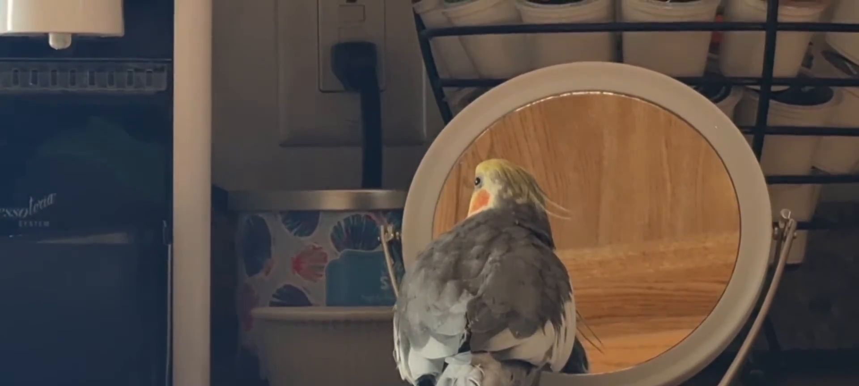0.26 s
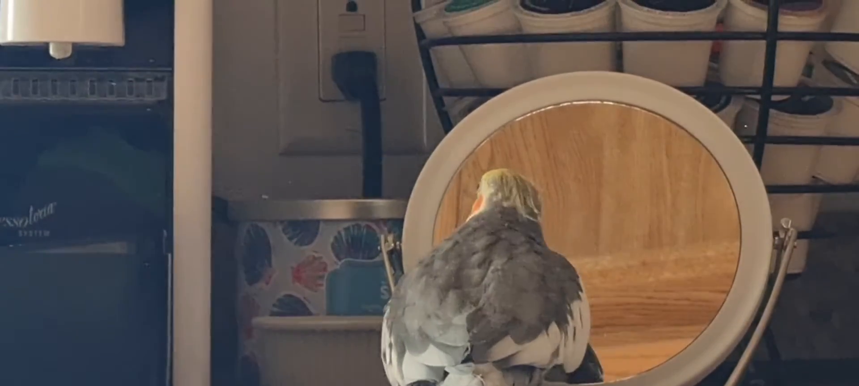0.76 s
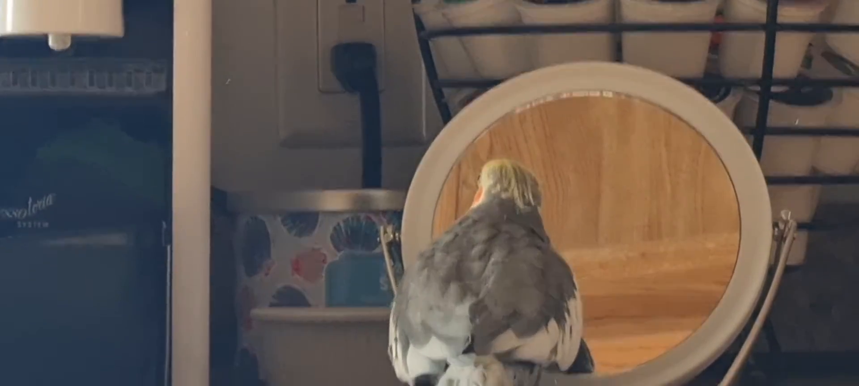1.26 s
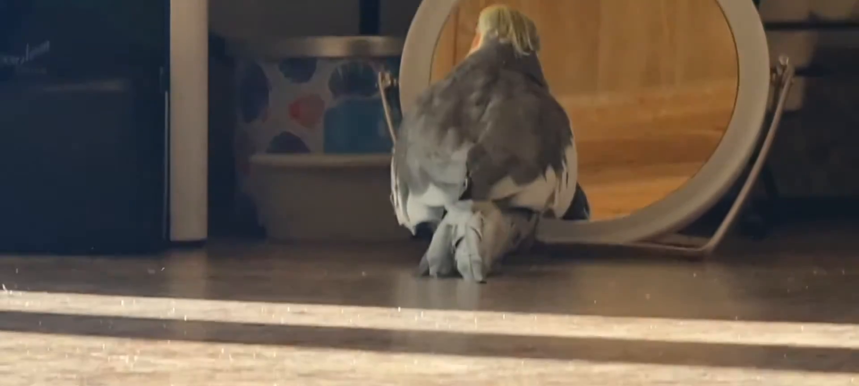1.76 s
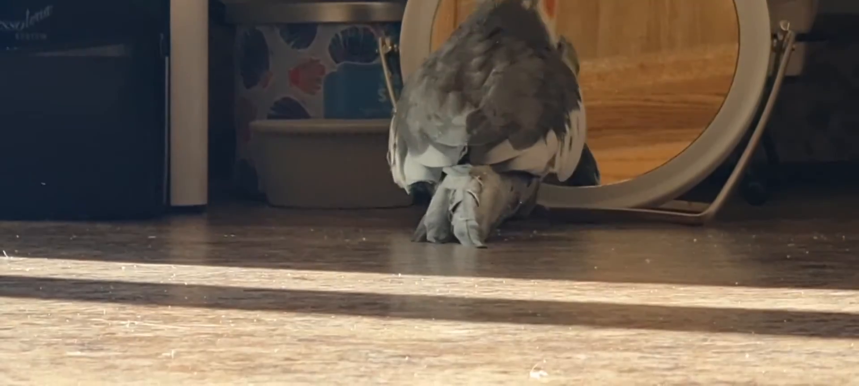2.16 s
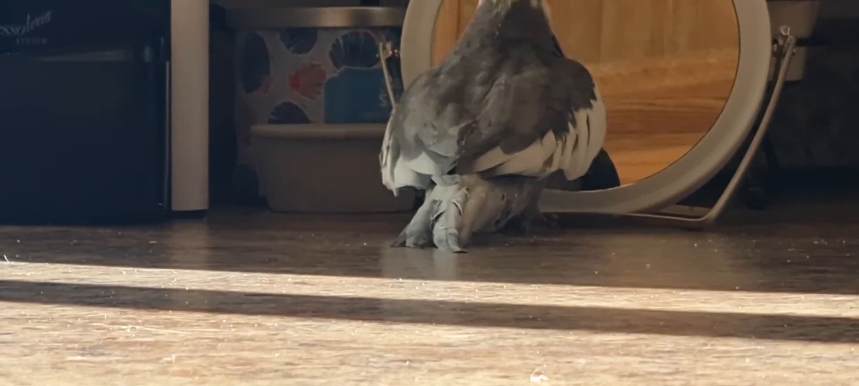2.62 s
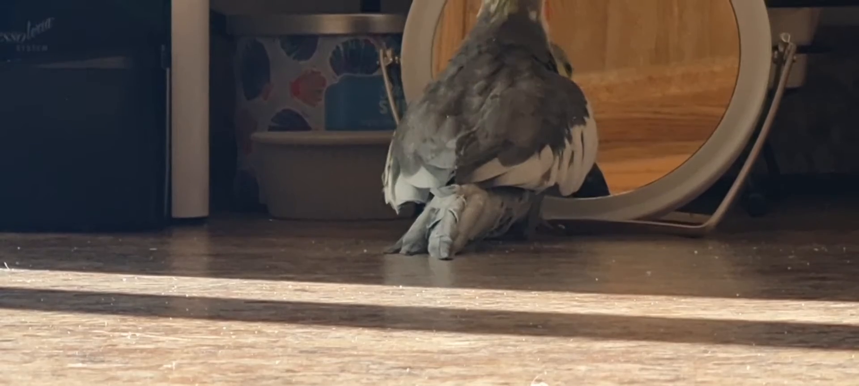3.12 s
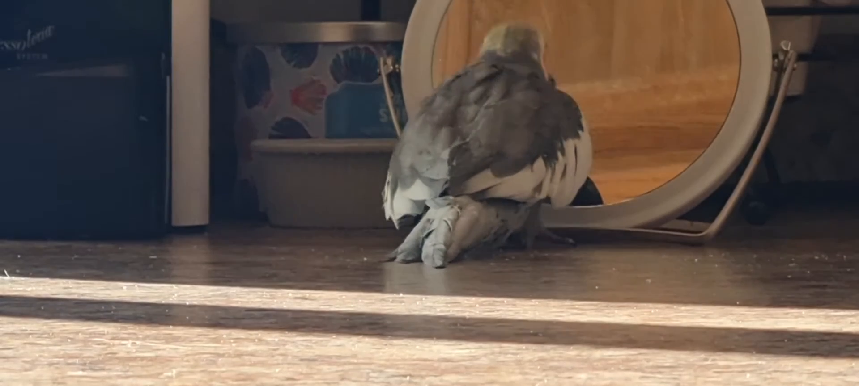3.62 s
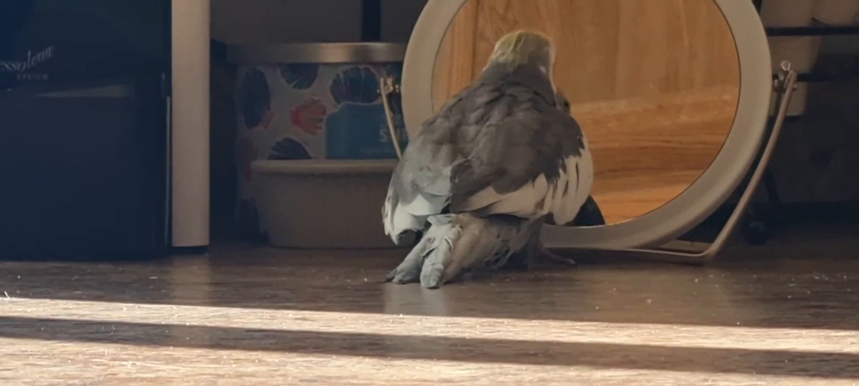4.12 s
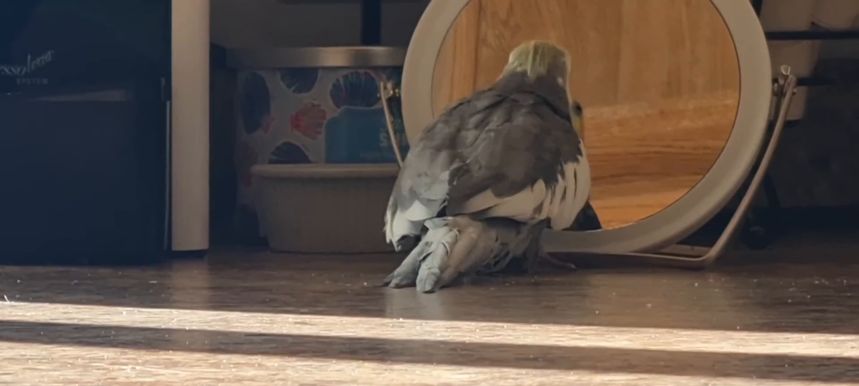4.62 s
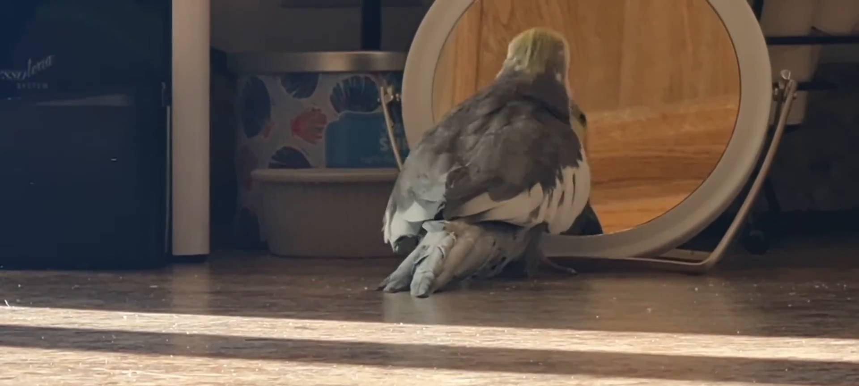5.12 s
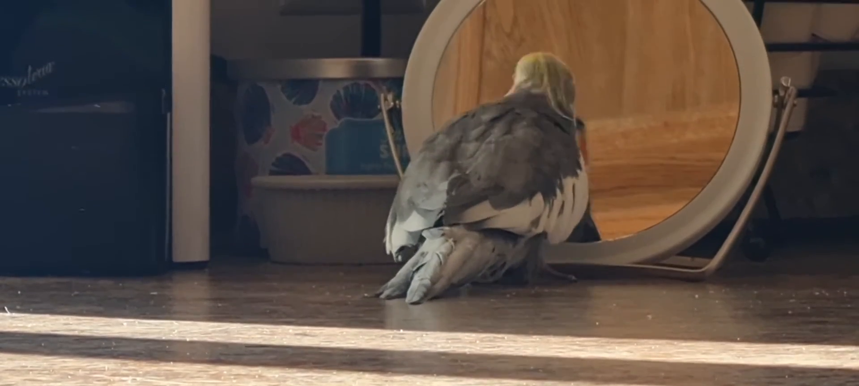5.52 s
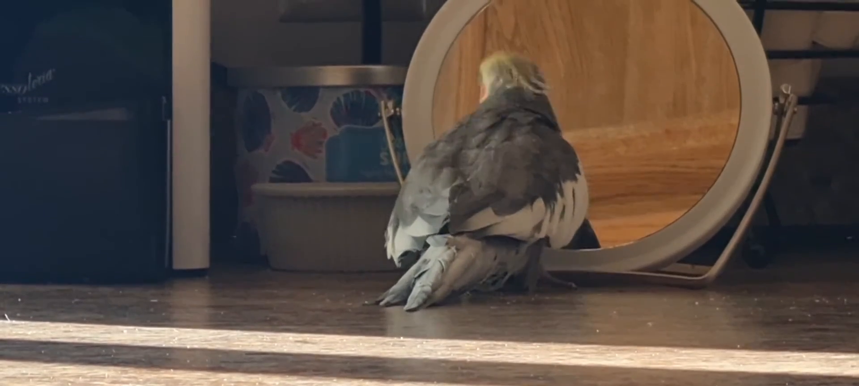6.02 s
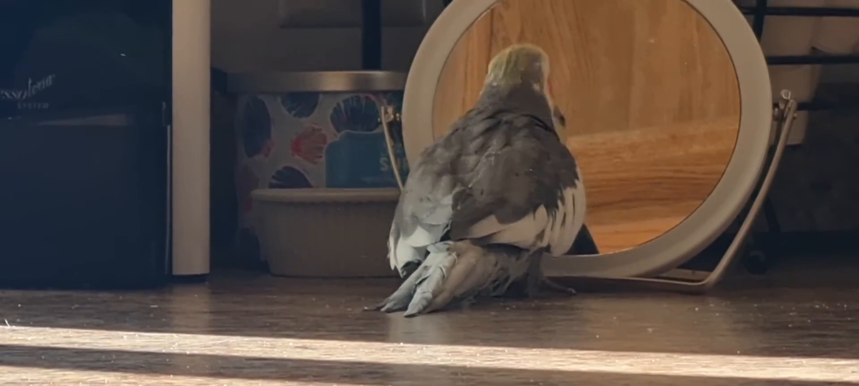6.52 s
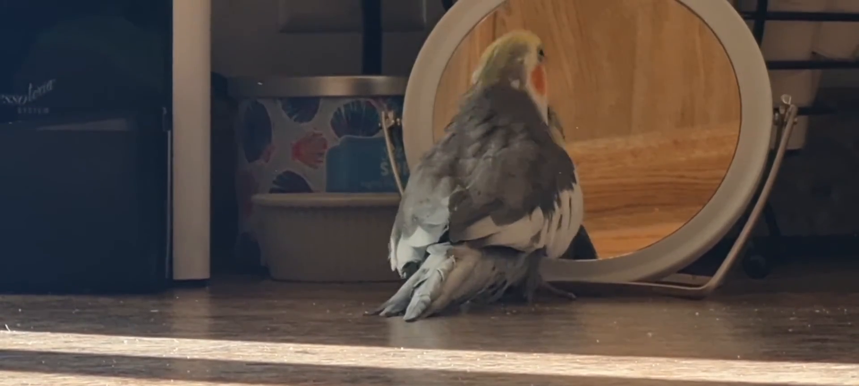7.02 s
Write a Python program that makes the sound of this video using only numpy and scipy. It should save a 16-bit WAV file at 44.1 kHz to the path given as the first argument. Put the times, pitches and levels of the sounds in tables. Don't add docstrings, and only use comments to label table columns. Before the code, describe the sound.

A cockatiel ticks its claws, chirps twice, then knocks its beak on wood and whistles short arched notes over a low household hum.

```python
import sys
import numpy as np
from scipy import signal
from scipy.fft import rfft, irfft
from scipy.io import wavfile
from scipy.ndimage import uniform_filter1d

SR = 44100
rng = np.random.default_rng(int(sys.argv[2]) if len(sys.argv) > 2 else 0)


def rack_gain(trim_db):
    fader = np.asarray(trim_db, float)
    return 10 ** (fader / 20)


def waveform_to_disk(signal):
    frames = np.transpose(np.atleast_2d(signal))
    scaled = np.clip(frames, -1, 1) * 32767
    samples = np.round(scaled).astype(np.int16)
    wavfile.write(sys.argv[1], SR, samples)


N = 320607

# time in seconds, pitch in Hz, level in dB.
HELD_NOTES = [
    [(2.915, 1718, -25.5), (2.973, 1930, -9.5), (3.009, 1942, -13), (3.061, 2089, -13.5),
     (3.159, 2013, -13.5), (3.203, 2060, -19.5), (3.225, 1933, -13), (3.245, 1702, -23),
     (3.26, 1834, -45.5)],
    [(3.51, 1531, -33.5), (3.532, 1522, -27), (3.558, 1740, -16.5), (3.606, 2071, -15.5),
     (3.658, 2117, -11), (3.684, 1921, -14.5), (3.716, 1457, -23), (3.734, 1306, -16.5),
     (3.775, 1200, -38.5)],
    [(4.85, 2059, -35.5), (4.86, 2168, -22), (4.876, 2216, -18.5), (4.906, 2080, -14), (4.93, 2187, -16.5),
     (4.96, 2141, -21), (4.99, 2224, -17), (5.014, 2009, -14), (5.03, 1954, -45)],
    [(5.55, 1664, -27), (5.592, 1891, -13.5), (5.648, 1873, -15), (5.73, 1788, -16.5), (5.738, 1696, -23),
     (5.786, 1745, -19.5), (5.808, 1676, -26.5), (5.912, 1647, -21), (5.945, 1576, -27.5)],
    [(6.515, 1830, -33.5), (6.559, 1956, -12), (6.569, 2055, -11), (6.655, 2186, -20), (6.687, 2063, -17.5),
     (6.729, 2092, -21), (6.821, 2135, -10.5), (6.891, 1952, -15), (6.9, 1956, -23.5)],]
# time in seconds, pitch in Hz, level in dB.
SLIDES = [
    [(5.305, 1670, -50), (5.317, 1708, -28), (5.397, 1422, -20.5), (5.405, 1286, -29.5),
     (5.41, 1414, -42.5)],
    [(7.165, 1615, -32), (7.189, 1599, -27), (7.207, 1794, -14.5), (7.243, 2041, -13), (7.27, 2075, -17.5)],
]
# multiple of the pitch, level in dB over the third overtone's setting.
LOW_OVERTONES = [(2, 9), (3, 5.5), (4, -11)]
# multiple of the pitch, level in dB over the sixth overtone's setting.
HIGH_OVERTONES = [(5, 4.5), (6, 5), (7, 3.5), (8, -13.5)]
EFFORT_DB, EFFORT_HZ = -15, 2050
OVERTONE_FOLLOWS, SIXTH_DB_PER_KHZ = 0.86, 61.5
SPLIT_DIMS_DB = 94.5
FALL_DB, FALL_FOLLOWS = -1, 0.35
FLUTTER_WANDER = 1.5
HAZE, HAZE_RASP = 0.24, 6.4


def whistles():
    valve, (hz, db) = phrases(sorted(HELD_NOTES + SLIDES + arches()), .005, .008)
    share, flutter_db, upper_db, rasp_db, third_db, sixth_db = quality()
    effort_db = OVERTONE_FOLLOWS * (db - EFFORT_DB) - SPLIT_DIMS_DB * rack_gain(flutter_db)
    third_db = third_db + effort_db
    sixth_db = sixth_db + effort_db + SIXTH_DB_PER_KHZ * (hz - EFFORT_HZ) / 1000

    phase = 2 * np.pi * np.cumsum(hz * (1 + 0.0026 * glide(drift(71, N), .003))) / SR
    tone = rack_gain(db + .6 * glide(drift(50, N), .004)) * np.sin(phase)
    wobble_db = 2 * drift(60, N), 2 * drift(60, N)
    haze = 1 + (HAZE + HAZE_RASP * rack_gain(rasp_db)) * drift(270, N)
    for k, over_db in LOW_OVERTONES:
        tone += rack_gain(third_db + over_db + wobble_db[k % 2]) * np.sin(k * phase) * haze

    def beak_db(f):
        return 10 * np.exp(-((f - 12800) / 1300) ** 2)

    for k, over_db in HIGH_OVERTONES:
        lift_db = beak_db(k * hz) - beak_db(6 * hz)
        tone += rack_gain(sixth_db + over_db + lift_db + wobble_db[k % 2]) * np.sin(k * phase) * haze
    rasp = band(band(rng.standard_normal(N), 70, 540), 40, 910)
    tone *= 1 + 7.6 * rack_gain(rasp_db) * rasp

    flutter = 2 * np.pi * np.cumsum(share * hz) / SR + FLUTTER_WANDER * share * drift(41, N)
    fall_db = FALL_DB + FALL_FOLLOWS * np.minimum(upper_db, 0)
    sides = np.zeros(N)
    for k in range(1, 5):
        side = rack_gain(db + flutter_db + (k - 1.5) * fall_db + 2.6 * wobble_db[k % 2])
        lower = np.sin(phase - k * flutter) * (k * share < .7)
        upper = rack_gain(upper_db) * np.sin(phase + k * flutter + k * k)
        sides += side * (lower + upper)
    sides = band(band(sides, 850, 2700), 820, 3100)
    return np.sqrt(2) * valve * (tone + sides)


# start in seconds, length in seconds, first pitch in Hz, top pitch in Hz,
# level in dB.
ARCHES = [
    (3.295, .1, 1956, 2104, -17),
    (4.635, .125, 1612, 2109, -15.5),
    (5.099, .107, 2006, 2028, -13.5),
    (5.997, 0.088, 1750, 1932, -15.5),
    (6.968, 0.079, 2000, 2075, -14),
]
# share of the length, share of the climb, droop as a share of the pitch,
# level in dB relative to the note.
ARCH = [(0.0, 0.0, 0.0024, -18), (.36, .75, 0.013, -1), (.62, 1.0, 0.0, 2.3), (.8, 1.0, .02, -1.3),
        (.93, 1.0, .09, -0.5), (0.999, 1.0, 0.14, -18)]


def arches():
    notes = []
    for s, length, low, top, db in ARCHES:
        notes.append([(s + at * length, (low + climb * (top - low)) * (1 - droop), db + under)
                      for at, climb, droop, under in ARCH])
    return notes


# start in seconds, third overtone in dB, sixth overtone in dB, onset rasp in dB.
VOICE = [(2.911, -60.5, -59, -61.5), (3.289, -57, -66.5, -11), (3.5, -54, -62.5, -13.5),
         (4.628, -57.5, -77, -21), (4.84, -62, -68, -49), (5.09, -59, -70, -17), (5.3, -62, -83, -6.5),
         (5.539, -55.5, -60.5, -59), (5.989, -53, -62.5, -7.5), (6.511, -57, -66, -38),
         (6.688, -59.5, -55, -50), (6.95, -58, -75.5, -6), (7.149, -51, -68, -13)]
# start in seconds, length in seconds, flutter rate as a share of the pitch,
# side tone in dB, upper over lower side tone in dB.
SPLITS = [
    (3.144, 0.046, 0.32, -50.5, -26),
    (4.869, 0.11, 0.51, -29, -13),
    (4.876, 0.14, 0.37, -43.5, -21.5),
    (5.297, 0.13, 0.54, -27.5, 3),
    (5.749, .056, .205, -22.5, -4.5),
    (5.806, .053, .143, -21.5, 1),
    (6.617, 0.16, 0.34, -31, -3.5),
]
RASP_HOLD_S, RASP_FADE_DB_PER_S, RASP_FLOOR_DB = 0.029, 1185.5, -66
ONSET_SIDE_DB, STEADY_SHARE, STEADY_UPPER_DB = -11, 0.27, -1
SPLIT_RASP_DB, SPLIT_RASP_FOLLOWS = -13, 0.66


def quality():
    t = np.arange(N) / SR
    voice = np.array(VOICE)
    note = np.clip(np.searchsorted(voice[:, 0], t) - 1, 0, None)
    since, third_db, sixth_db, onset_db = voice[note].T
    faded_db = onset_db - RASP_FADE_DB_PER_S * np.clip(t - since - RASP_HOLD_S, 0, None)
    rasp_db = np.maximum(faded_db, RASP_FLOOR_DB)
    rows = np.array([STEADY_SHARE + 0 * t, rasp_db + ONSET_SIDE_DB, STEADY_UPPER_DB + 0 * t, rasp_db])
    for s, length, share, side_db, upper_db in SPLITS:
        within = (t > s) & (t < s + length)
        rows[:3, within] = [[share], [side_db], [upper_db]]
        rows[3, within] = np.maximum(rasp_db[within], SPLIT_RASP_DB + SPLIT_RASP_FOLLOWS * side_db)
    return glide(np.vstack([rows, third_db, sixth_db]), .006)


# time in seconds, twice the pitch in Hz, level in dB, strain in dB.
CHIRPS = [
    [(.7435, 2125, -48.5, 1), (.755, 2050, -44, -5.5), (.758, 2178, -28, -14.5), (.764, 1912, -18.5, -11.5),
     (.772, 1685, -29, -1), (.78, 1846, -27.5, -12), (.8, 1872, -25, -13.5), (.815, 1317, -35.5, -19),
     (.822, 1332, -42, -13.5)],
    [(.852, 1257, -33, -9), (.87, 1331, -27.5, -22.5), (.89, 1522, -27.5, -5.5), (.912, 1886, -17, -4.5),
     (.937, 1891, -32, 1), (.945, 1575, -40.5, -3.5), (.98, 1173, -35.5, -12.5), (1.0, 1179, -54, -17)],
]
# frequency in Hz, gain in dB.
THROAT = [(400, -47), (900, -25.5), (1300, 6.5), (1900, -2.5), (2500, 0), (2850, -3), (3350, -26.5),
          (3800, -26.5), (4800, -27), (6000, -44.5), (7600, -36.5), (8600, -65), (13000, -44),
          (15500, -53.5)]
CHIRP_ROUGH = 0.29
AIR_DB, AIR_FOLLOWS_LEVEL, AIR_FOLLOWS_STRAIN = -17, 0.4, 1.3


def chirps():
    valve, curves = phrases(CHIRPS, .002, .005)
    size = int(1.1 * SR)
    hz, db, strain_db = curves[:, :size]
    phase = np.pi * np.cumsum(hz * (1 + 0.0026 * drift(90, size))) / SR
    stack = np.zeros(size)
    for k in range(1, 17):
        partial_db = at_hz(THROAT, k * hz / 2) + (k != 2) * strain_db
        stack += rack_gain(partial_db) * np.sin(k * phase)
    stack *= 1 + CHIRP_ROUGH * drift(250, size) * (hz < 1750) * (np.gradient(hz) < 0)

    white = rng.standard_normal(size)
    air = 3 * band(band(band(white, 1050, 3000), 1000, 3100), 950, 3200)
    air += .07 * band(band(white, 4200, 7600), 4200, 7600)
    air_db = AIR_DB + AIR_FOLLOWS_LEVEL * db + AIR_FOLLOWS_STRAIN * strain_db
    voice = np.sqrt(2) * rack_gain(db + 1.5 * drift(70, size)) * stack
    voice += rack_gain(air_db + 3 * drift(80, size)) * air
    return np.pad(voice, (0, N - size)) * valve


def phrases(tables, edge_s, glide_s):
    s, *columns = np.transpose(np.concatenate(tables))
    t = np.arange(N) / SR
    spans = np.array([(rows[0][0], rows[-1][0]) for rows in tables])
    stretch = np.clip(np.searchsorted(spans[:, 0], t) - 1, 0, None)
    sounding = (t > spans[stretch, 0]) & (t < spans[stretch, 1] + .002)
    curves = np.array([np.interp(t, np.sort(s), c) for c in columns])
    return glide(sounding * 1., edge_s), glide(curves, glide_s)


# time in seconds, peak in dB, deep thump in dB, bright crack in dB.
KNOCKS = [(2.3899, -16, -52.5, -37), (2.8639, -14.5, -39.5, -36.5), (3.3253, -19, -48.5, -52.5),
          (3.7159, -24.5, -53, -44), (4.09, -17, -40.5, -46.5), (4.614, -19, -45.5, -48.5),
          (5.0821, -22.5, -49, -43), (5.5126, -19.5, -67, -52), (6.0138, -25.5, -88, -52),
          (6.486, -16.5, -50.5, -47), (6.9288, -20, -51.5, -49)]
# frequency in Hz, level in dB, decay time t60 in seconds.
KNOCK_MODES = [(972, -20, 0.027), (1150.6, -11.5, 0.072), (1400, -5, 0.023), (1750, -5, 0.012),
               (2496, -4, 0.0067), (4870, -15, 0.0048), (8900, -18.5, 0.054)]
# frequency in Hz, level in dB, decay time t60 in seconds.
THUMPS = [(397, -1, 0.043), (226.2, 3, 0.3), (255, 9, 0.064)]
THUMP_DB = -28.5
KNOCK_LEAN_DB, KNOCK_LEAN_DB_PER_S = -2.5, 0.95
SWELL_DB, SWELL_S = -19, .006


def knocks():
    s, db, deep_db, crack_db = np.transpose(KNOCKS)
    at = np.round(s * SR).astype(int) + 20
    vary_db = rng.normal(0, 3, (len(s), len(KNOCK_MODES) + 1))
    sides = rack_gain(np.outer([.5, -.5], KNOCK_LEAN_DB + KNOCK_LEAN_DB_PER_S * s))

    def struck(level_db):
        hits = np.zeros((2, N))
        hits[:, at] = sides * rack_gain(level_db)
        return hits

    def noisy(hits, shape, low_hz, high_hz):
        envelope = signal.fftconvolve(hits, shape[None], mode="same", axes=1)
        return envelope * band(rng.standard_normal(N), low_hz, high_hz)

    lag = np.arange(-900, 901) / SR
    before, after = rack_gain(-18.0) * np.exp(lag / 0.0017), rack_gain(-9.5) * np.exp(-np.abs(lag) / .005)
    out = noisy(struck(crack_db + 17.5), np.where(lag < 0, before, after), 1500, 10000)
    out += noisy(struck(db + SWELL_DB), np.where(lag < 0, np.exp(lag / SWELL_S), 0), 900, 5000)

    body = -.5 * band(np.roll(struck(db), -9, axis=1), 800, 4500)
    for k, (hz, mode_db, t60) in enumerate(KNOCK_MODES):
        body += ring(struck(db + 9.0 + mode_db + vary_db[:, k]), hz, t60)
    out += band(band(glide(body, .0002), 720, 9000), 600, 12000)

    for (hz, mode_db, t60), level_db in zip(THUMPS, (THUMP_DB, deep_db, deep_db)):
        late = np.roll(struck(level_db + mode_db + vary_db[:, -1]), 150, axis=1)
        out += band(ring(late, hz, t60), hz * .75, hz * 1.3)
    return band(out, 190, 16000)


# time in seconds, level in dB.
RUSTLE = [
    (3.991, -79.5),
    (4.041, -57),
    (4.087, -38),
    (4.119, -57),
]
# time in seconds, bright part in dB, dull part in dB.
TICKS = [(0.393, -41, -25.5), (0.416, -70, -44), (0.445, -65, -33.5), (0.494, -61, -30), (0.516, -65, -34),
         (4.43, -55.5, -46), (4.469, -53, -45), (4.53, -54, -47)]
# frequency in Hz, level in dB, decay time t60 in seconds.
WIRE_MODES = [(3250, -49, 0.54), (6300, -52, 0.35)]
WIRE_S = 4.115


def claws():
    s, rustle_db = np.transpose(RUSTLE)
    white = rng.standard_normal(N)
    scrape = np.zeros(N)
    for hz, db in [(2400, 9.2), (3500, 10), (4700, 4), (6200, 3)]:
        strip = band(band(white, hz * 0.58, hz * 1.0), hz * 0.44, hz * 0.57)
        scrape += strip * rack_gain(db + 7.2 * drift(25, N))
    scrape *= rack_gain(np.interp(np.arange(N) / SR, s, rustle_db, left=-140, right=-140))

    bright, dull, jolt = np.zeros((3, N))
    at = [round(row[0] * SR) for row in TICKS]
    bright[at], dull[at] = rack_gain(np.array(TICKS)[:, 1:].T)
    jolt[round(WIRE_S * SR)] = 1
    wire = sum(rack_gain(db) * ring(jolt, hz, t60) for hz, db, t60 in WIRE_MODES)
    return scrape + band(bright, 200, 7000) + band(dull, 150, 1300) + wire * drift(70, N)


# delay in seconds, left level in dB, right level in dB.
ECHOES = [(.0021, -12, -25.5), (.0072, -13, -18.5), (.0112, -10.5, -26.5), (.0185, -22.5, -20.5)]
# band centre in Hz, decay time t60 in seconds, level in dB, side over mid in dB.
ROOM = [(275, 0.22, -34, -13), (570, 0.12, -35, -5), (1130, 0.32, -41.5, 3), (2000, 0.48, -46.5, -3),
        (4110, 0.26, -29.5, -4), (7400, 0.16, -31.5, 8), (13000, 0.33, -26, -9.5)]


def room(x):
    t = np.arange(int(.8 * SR)) / SR
    answer = np.zeros((2, len(t)))
    for hz, t60, db, side_db in ROOM:
        mid, side = band(rng.standard_normal((2, len(t))), hz / np.sqrt(2), hz * np.sqrt(2))
        decay = np.clip(t / 0.002, 0, 1) * rack_gain(db - 60 * t / t60)
        answer += decay * (mid + rack_gain(side_db) * side * [[1], [-1]])
    answer[:, 0] = 1
    for s, *db in ECHOES:
        answer[:, round(s * SR)] += rack_gain(np.array(db))
    return signal.fftconvolve(x, answer, axes=1)[:, :N]


# frequency in Hz, density in dB per Hz.
HUM = [(18, -34.5), (30, -20), (48, 1), (125, -18.5), (194, -8.5), (217, -20.5), (265, -12), (307, -24),
       (338, -13), (398, -16), (600, -14), (706, -23), (1500, -40.5), (1950, -74), (3300, -120)]
# frequency in Hz, density in dB per Hz.
HISS = [(880, -31.5), (1500, 2), (2470, -2.5), (2780, -1.5), (4530, -2.5), (5450, -1), (7820, -17.5),
        (15500, -20.5)]
# frequency in Hz, rms level in dB.
MOTOR_LINES = [(119, -62), (57, -60.5), (1120, -85)]
HUM_DB, HISS_DB = -59, -81.5


def hum():
    out = coloured(HUM, HUM_DB) + coloured(HISS, HISS_DB)
    for line_hz, db in MOTOR_LINES:
        phase = 2 * np.pi * line_hz * np.arange(N) / SR + 2.7 * drift(5, N)
        out = out + np.sqrt(2) * rack_gain(db + 1.2 * drift(1.7, N)) * np.sin(phase)
    return out * rack_gain([[-.6], [.6]])


# frequency in Hz, left-right correlation as a share.
HUM_ALIKE = [(30, 0.79), (180, .9), (450, 0.43), (1000, 0.3), (5000, .2)]


def coloured(spectrum, db):
    hz = np.maximum(np.arange(N // 2 + 1) * SR / N, 1)
    mid, side = rfft(rng.standard_normal((2, N))) * rack_gain(at_hz(spectrum, hz))
    alike = np.clip(at_hz(HUM_ALIKE, hz), 0, 1)
    out = irfft(np.sqrt(1 + alike) * mid + np.sqrt(1 - alike) * side * [[1], [-1]], N)
    return rack_gain(db) * out / np.std(out)


def ring(hits, hz, t60):
    r, w = rack_gain(-60 / (t60 * SR)), 2 * np.pi * hz / SR
    return signal.lfilter([0, np.sin(w)], [1, -2 * r * np.cos(w), r * r], hits + 1e-18)


def drift(rate_hz, size):
    r = np.exp(-2 * np.pi * rate_hz / SR)
    slow = signal.lfilter([1], [1, -2 * r, r * r], rng.standard_normal(size + 4000))[4000:]
    return slow * np.sqrt((1 - r * r) ** 3 / (1 + r * r))


def glide(x, s):
    size = max(int(s * SR / 2), 1)
    return uniform_filter1d(uniform_filter1d(x, size=size), size=size)


def band(x, low_hz, high_hz):
    return signal.sosfilt(signal.butter(2, [low_hz, min(high_hz, .45 * SR)], "band", fs=SR, output="sos"), x)


def at_hz(points, hz):
    points = np.array(points)
    return np.interp(np.log(hz), np.log(points[:, 0]), points[:, 1])


def panned(x, lean_db):
    return x * rack_gain(np.multiply.outer([.5, -.5], lean_db * np.ones(N)))


# time in seconds, left over right in dB.
HEAD = [(0.0, -2.0), (1.5, 3), (2.47, -2.5), (2.63, 0), (4.13, 0.5), (6.15, 3), (6.42, 1), (7.27, 1.5)]


def scene():
    lean_db = np.interp(np.arange(N) / SR, *np.transpose(HEAD))
    bird = rack_gain(-1.5) * panned(band(whistles() + chirps(), 600, 19000), lean_db)
    return room(bird + knocks() + claws()) + hum()


def band_limit(x):
    return signal.sosfilt(signal.butter(12, 16390, fs=SR, output="sos"), x)


TREBLE_LEAN_DB, TREBLE_HZ = -8.5, 5560


def record(dry):
    treble = signal.sosfilt(signal.butter(1, TREBLE_HZ, "high", fs=SR, output="sos"), dry)
    left, right = dry + treble * (rack_gain(np.array([[.5], [-.5]]) * TREBLE_LEAN_DB) - 1)
    late_right = np.r_[right[0], right[:-1]]
    return band_limit(np.array([left, late_right]))


dry = scene()
out = record(dry)
waveform_to_disk(out)
```